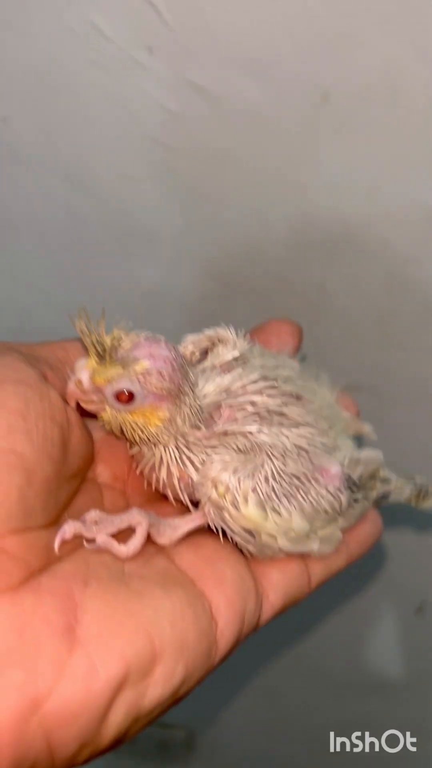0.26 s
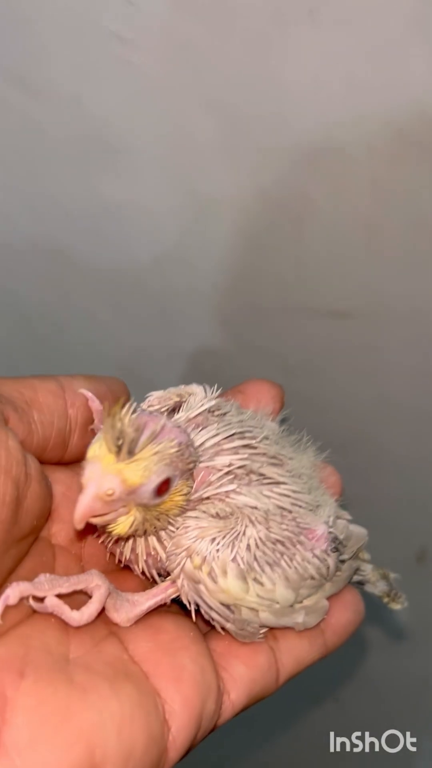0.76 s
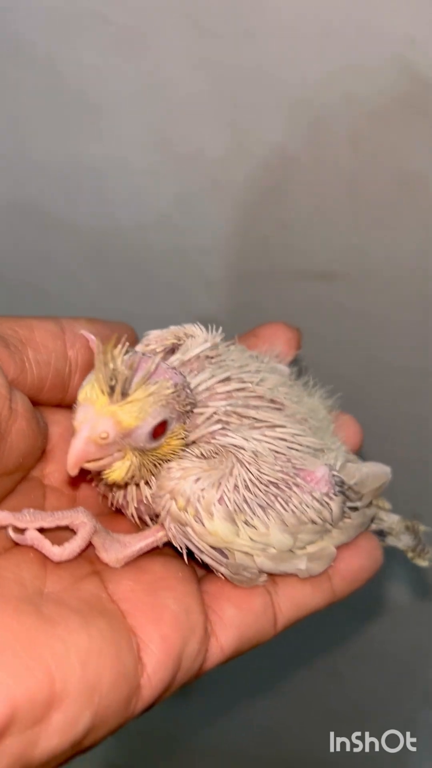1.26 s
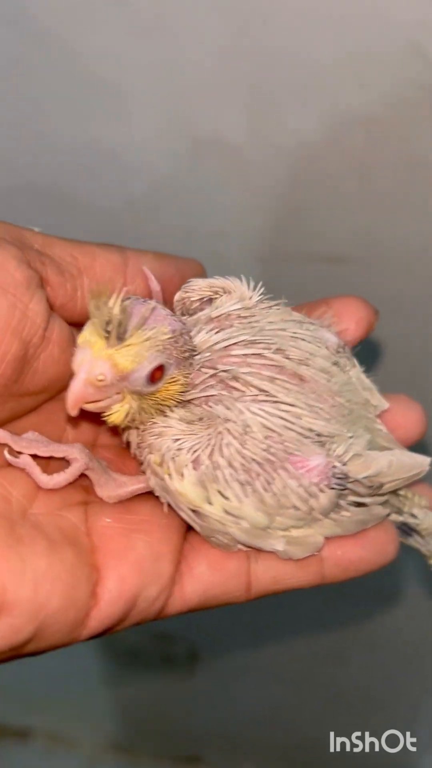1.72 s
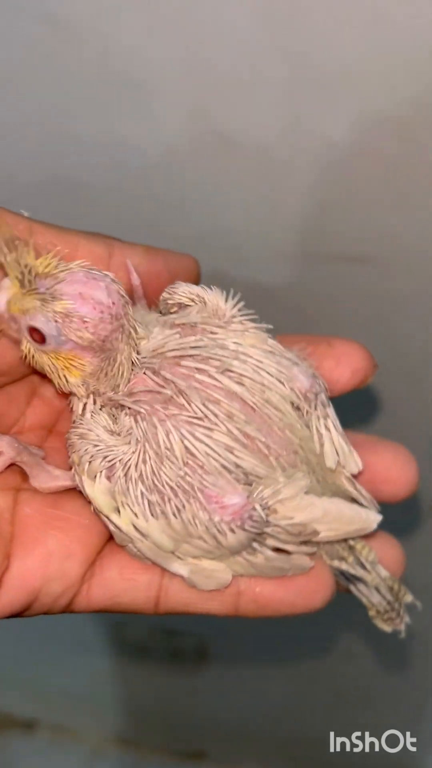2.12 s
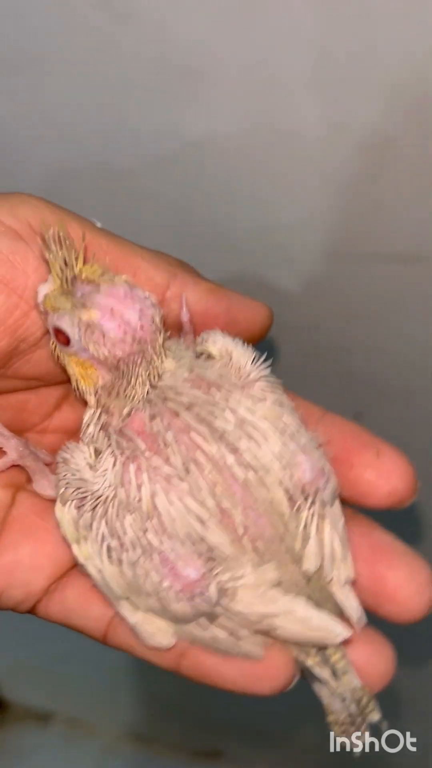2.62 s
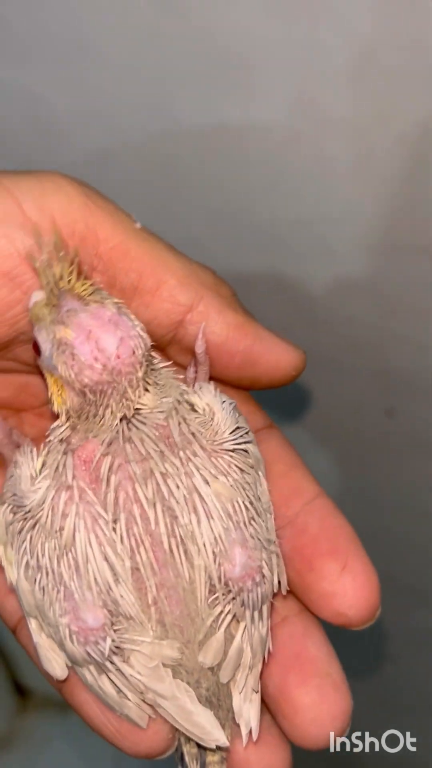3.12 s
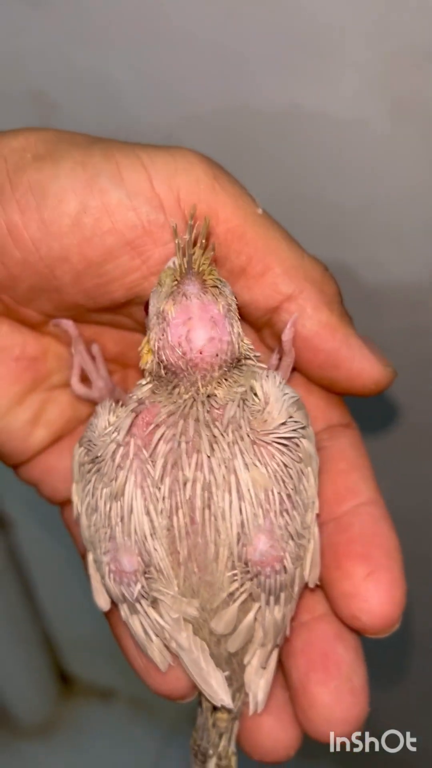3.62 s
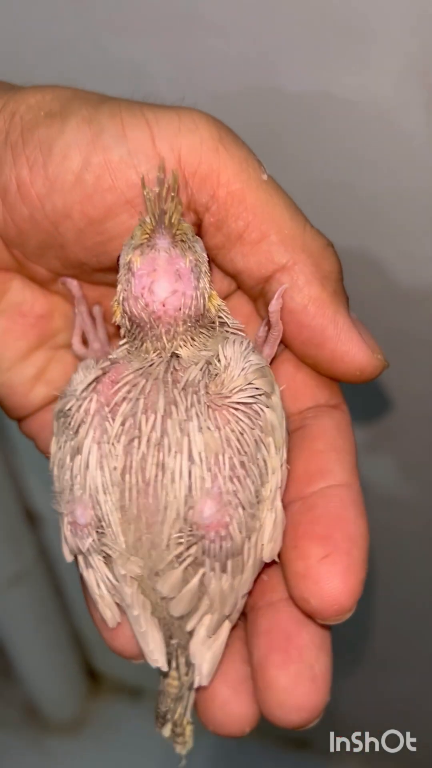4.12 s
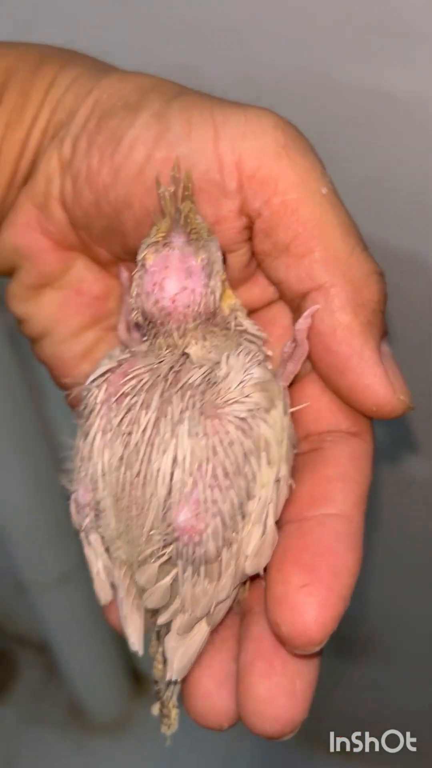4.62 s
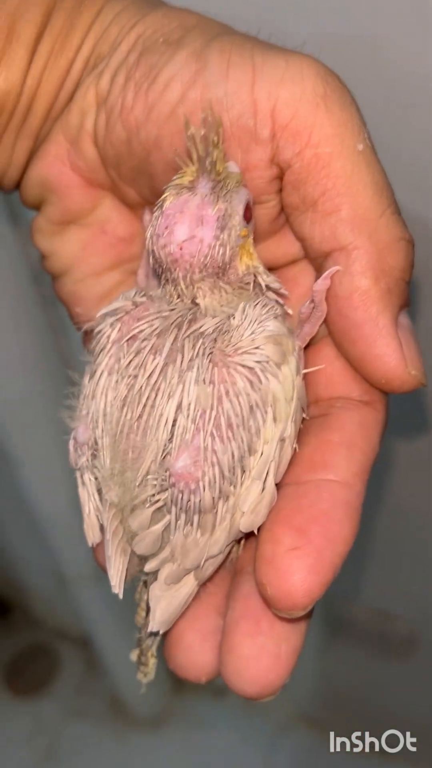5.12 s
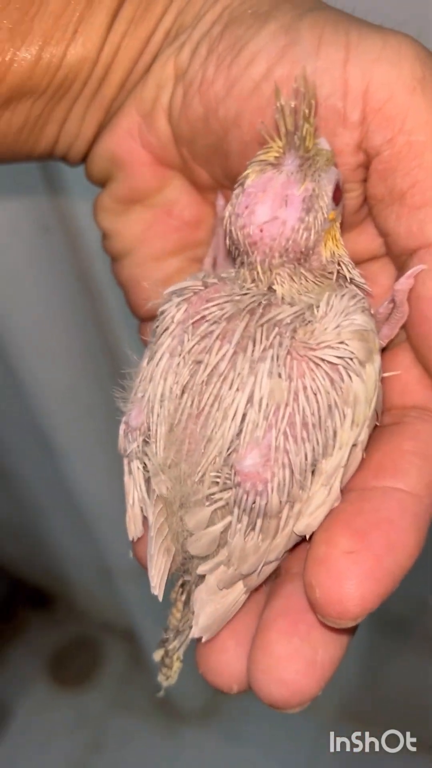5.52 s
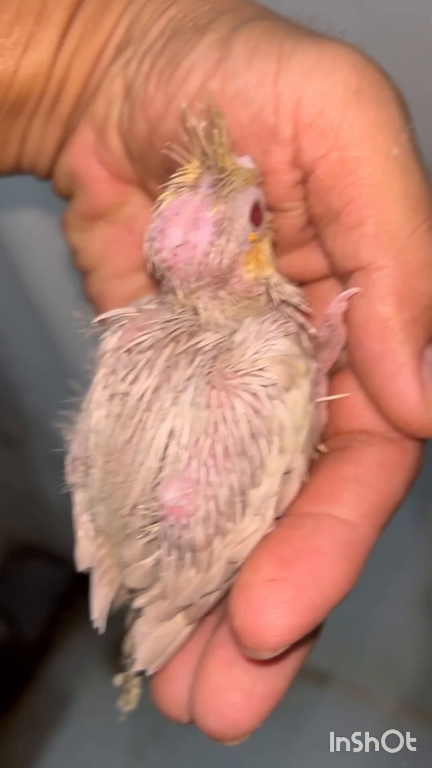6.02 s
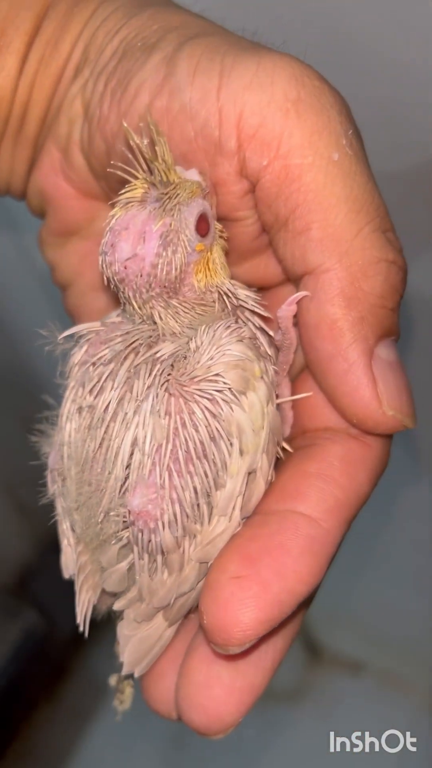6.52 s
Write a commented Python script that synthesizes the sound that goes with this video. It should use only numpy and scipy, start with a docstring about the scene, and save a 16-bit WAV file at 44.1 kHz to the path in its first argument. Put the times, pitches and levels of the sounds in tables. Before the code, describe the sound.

A cockatiel chick begs close to the microphones in a bare, reflective room. From 0 s, rough, scratchy calls follow one another several times a second, each about a tenth to a quarter of a second, scooping upward and sagging, with a shaky whistle, a strong octave and torn rasp between. Breathy hiss spurts at about 0.8, 1.2 and 1.5 s. Two loud squeals come at 2.25 and 2.6 s, the second higher. From 2.9 to 3.8 s the calls are thinner and mixed, over husky chatter. A long clear squeal sounds at 4.05 s, then hoarse cries and a sharp hiss near 4.5 s. After a short lull around 4.85 to 5.05 s, overlapping begging and thin peeps resume, with another strong squeal at 6.13 s, easing into weaker cries by 6.8 s. Faint rumble, distant drones and soft hand shuffles lie underneath.

```python
"""A cockatiel chick, held in a hand in a bare room, begs with scratchy, arching squeals; others seem to overlap it.
Each call is a shaky whistle with an octave, plus a rasp of narrow noise bands between the two.
Bursts of hiss and husky chatter, made of coloured noise and half-voiced peeps, come among the calls.
Early slaps and a decaying tail from the hard walls smear all these voices.
Low rumble, hand shuffles, faint drones and thin hiss lie beneath; two unlike microphones take it all in."""
import sys
import numpy as np
from scipy import signal
from scipy.fft import rfft, irfft, next_fast_len
from scipy.io import wavfile
from scipy.ndimage import uniform_filter1d

SR = 44100
rng = np.random.default_rng(int(sys.argv[2]) if len(sys.argv) > 2 else 0)


def unload_wav(signal):
    """Save mono or channel-first audio to the path in sys.argv[1] as 16-bit WAV at rate SR, clipped to [-1, 1]."""
    wavfile.write(
        sys.argv[1],
        SR,
        np.round(np.clip(np.atleast_2d(signal).T, -1, 1) * 32767).astype(np.int16),
    )


N = 298116  # length of the scene in samples

# The four loud, clear squeals, one curve each. Each row: time in seconds, pitch in Hz before the shake,
# relative levels of fundamental, octave and rasp in dB, roughness 0-1.
SQUEAL_CURVES = [
    [(2.25, 1658, -29, -31, -49, 0.34), (2.285, 1997, -31.5, -16.5, -63, 0.28),
     (2.36, 2054, -28, -19, -56, 0.03), (2.41, 2214, -24.5, -17.5, -39, 0.07),
     (2.47, 2268, -33, -21.5, -25, 0.06), (2.52, 2220, -25, -26, -27, .1),
     (2.57, 2160, -65, -22, -20, 0.41)],
    [(2.61, 1866, -40, -23, -54, 0.28), (2.66, 1976, -27, -14, -21, 0.35),
     (2.7, 2497, -22.5, -24, -25.5, 0.25), (2.78, 2672, -23, -27.5, -35, 0.08),
     (2.86, 2700, -24, -27, -31, 0.27), (2.915, 2610, -23, -31, -31, 0.24),
     (2.97, 2590, -55, -45, -45, 0.34)],
    [(4.05, 1656, -39, -27, -34, 0.04), (4.085, 2024, -45, -15.5, -21.5, 0.15),
     (4.18, 2069, -24, -12, -36.5, 0), (4.27, 2182, -30.5, -19, -57, 0.01),
     (4.34, 2099, -24, -15, -52, 0.09), (4.37, 2028, -39, -17, -17, 0.21), (4.42, 2072, -41, -27, -33, .05),
     (4.47, 2080, -51, -27, -23, 0.08)],
    [(6.13, 1579, -58, -24, -40, .3), (6.18, 1965, -28.5, -13, -19.5, 0.26),
     (6.26, 1964, -31, -10.5, -33.5, 0.19), (6.32, 2087, -26.5, -19, -34, .16),
     (6.4, 2011, -36, -11.5, -67, 0.24), (6.48, 1970, -32, -32, -53, 0.36),
     (6.6, 1878, -40, -37, -32, 0.31)],
]
# Begging calls, mostly rough, a few clear. Each row: start in seconds, length in seconds,
# rise to the top in seconds, top pitch in Hz, scoop (share below the top at the start),
# sag (share below it at the end), relative levels of fundamental, octave and rasp in dB,
# roughness 0-1, swell from start to end in dB.
BEG_CALLS = [ (0.0, 0.027, 0.09, 1403, 0.089, 0, -42, -19.5, -30, 0.76, -49),
             (0.098, 0.12, 0.11, 1766, 0.16, 0.18, -43, -22.5, -29.5, 0.75, 4.5),
             (0.155, 0.087, 0.049, 2444, 0.00067, 0.025, -25.5, -42, -46, 0.53, 0),
             (0.26, 0.066, .01, 1972, 0.015, 0.19, -52, -17.5, -44, 0.47, -8),
             (0.337, .15, .01, 1760, 0.018, 0, -36, -44, -60, 0.63, -4),
             (0.55, 0.17, 0.11, 2416, 0.13, 0.16, -32, -54, -55, 0.7, 2),
             (0.651, 0.14, 0.0086, 1935, 0.049, 0.034, -40, -31, -40.5, 0.38, -13),
             (0.773, 0.21, .12, 1781, 0.21, 0.013, -33, -31.5, -51, 0, -3),
             (0.849, 0.21, .125, 2397, .25, 0.03, -27.5, -21, -24.5, .5, 4),
             (0.973, 0.12, 0.055, 1636, .05, 0.0045, -33, -45, -48, 0.34, 8),
             (1.167, 0.24, .14, 1956, .24, 0.12, -35.5, -18.5, -27, 0.46, 4.5),
             (1.387, 0.14, .09, 2276, .1, 0.051, -26, -33.5, -27, 0.78, 0),
             (1.52, 0.1, .09, 1975, .1, 0, -28, -26, -52, 0.8, -5),
             (1.599, 0.16, 0.12, 2376, 0.043, 0.0084, -22, -28.5, -57, 0.54, 3),
             (1.73, 0.057, 0.0037, 2066, 0, 0.28, -26.5, -25, -31, 0.42, -2),
             (1.813, 0.16, 0.085, 3160, 0.15, 0, -46, -38.5, -39, .6, -11),
             (1.997, 0.14, 0.11, 2518, .25, 0.039, -31.5, -32.5, -28, .7, -5),
             (2.091, 0.12, 0.0078, 2514, 0, .12, -25, -47, -39, 0.63, 0),
             (2.112, 0.092, 0.042, 3083, 0.066, 0.05, -26.5, -41, -48, 0.78, -4),
             (2.437, 0.15, 0.15, 1824, 0.025, 0.018, -38.5, -20.5, -26, 0.48, 0),
             (2.705, .15, 0.094, 2003, 0.033, 0.051, -35, -55, -54, 0.42, 3),
             (2.92, 0.23, 0.0031, 3715, 0.03, 0.18, -44, -42, -60, 0.3, -5),
             (3.107, .12, 0.081, 1986, 0.023, 0, -34, -66, -75, 0.43, -20),
             (3.165, 0.4, .15, 3787, .05, 0.0031, -42.5, -45, -69, 0.1, -9),
             (3.254, 0.058, 0.017, 1923, 0, 0.018, -27.5, -62, -61, .5, -3),
             (3.306, .13, 0.0333, 2675, 0.17, 0.0071, -29, -44, -59, 0.25, -4),
             (3.497, 0.098, 0.047, 2574, 0.079, 0.094, -34.5, -42, -35, 0.5, -2),
             (3.56, 0.1495, .045, 1749, 0.22, .04, -44, -23, -35, 0.55, -2),
             (3.76, 0.045, 0.012, 3215, 0, 0.082, -29, -32, -55, 0.2, -7),
             (3.945, 0.11, 0.039, 2100, 0.1, 0, -35, -27, -49, 0.54, -12),
             (4.343, 0.15, 0.029, 1726, 0, 0.037, -70, -30.5, -42, 0.03, 20),
             (4.537, 0.17, .135, 2051, .26, 0.012, -31, -21, -41, 0.44, 0),
             (4.741, 0.072, 0.008, 1890, 0.014, 0.069, -31.5, -21.5, -30.5, 0.48, -19),
             (5.075, 0.24, 0.077, 2257, .23, 0.26, -29.5, -44.5, -37, 0.49, 0),
             (5.284, 0.15, 0.064, 1674, 0.051, 0.0021, -41, -22.5, -33.5, 0.53, -11.5),
             (5.454, 0.13, 0.049, 1738, .11, 0.054, -49, -21, -54, 0.21, -7),
             (5.473, 0.11, 0.049, 2730, 0.24, 0.019, -40, -29.5, -26.5, 0.7, -6),
             (5.58, .16, 0.12, 1776, 0.056, 0, -66, -29.5, -44, 0.53, 0),
             (5.649, 0.19, 0.0068, 1457, 0, 0.02, -41, -40.5, -62, 0.7, -6),
             (5.875, 0.17, .01, 1552, 0, .06, -44, -41, -56, .8, 13),
             (6.012, 0.17, 0.075, 2218, 0.21, 0.033, -39.5, -31, -28.5, 0.97, -10.5),
             (6.2, 0.17, 0.054, 1732, .03, 0.0095, -47, -24.5, -34.5, 0.32, -2),
             (6.509, 0.088, 0.053, 2080, 0.12, 0, -29.5, -35, -30.5, 0.77, -3), ]
# Thin whistled peeps. Each row: start in seconds, length in seconds, first pitch in Hz, last pitch in Hz,
# relative level in dB, roughness 0-1, swell from start to end in dB.
PEEP_CALLS = [ (0.939, 0.05, 3250, 3200, -17, 0.07, -5), (.995, .155, 3253, 2920, -19, .17, -9.5),
              (1.11, 0.11, 2560, 2380, -23, .45, 0), (1.952, 0.055, 2620, 2666, -31, 0.2, -8),
              (3.763, .13, 3140, 2820, -29.5, .22, 17), (3.91, .16, 2930, 2630, -26.5, 0.31, -9),
              (4.804, 0.059, 3230, 3070, -27.5, 0.1, 9), (5.15, 0.12, 2800, 3045, -33.5, 0.3, -1),
              (5.333, 0.068, 2830, 2890, -24.5, 0.37, -7), (5.41, 0.1, 2880, 3020, -27.5, 0.2, 10),
              (5.886, 0.18, 3020, 2748, -29.5, 0.69, 10), (6.1, 0.13, 3200, 3190, -24, 0.09, -1),
              (6.579, 0.087, 2702, 2760, -26.5, .28, -1), (6.723, 0.057, 2870, 2620, -30, 0.05, -13), ]
# Upper harmonics of a call. Each row: multiple of the fundamental, level in dB against (mostly) the octave,
# change in dB at full roughness.
OVERTONE_LEVELS = [(3, -16.5, -32.5), (4, -22, -8), (5, -19.5, -30), (6, -38, -26), (7, -44.5, -32)]
RISE_BEND, SAG_BEND = 1.4, 1.3  # powers that round the two sides of the pitch arch
ATTACK_S, RELEASE_S, ENDS_DB = 0.029, 0.033, -4  # a call swells from ENDS_DB, holds and dies back to it
PEEP_OCTAVE_DB, PEEP_RASP_DB = -34.5, -17  # against a peep's fundamental

# Hiss through the open beak. Each row: start in seconds, length before the quick fade in seconds,
# relative level in dB.
HISS_BURSTS = [(-.02, 0.12, -30), (.52, 0.36, -46), (.8, 0.15, -27), (1.18, 0.043, -18.5),
               (1.32, 0.092, -28), (1.53, 0.096, -29.5), (1.68, 0.21, -34.5), (2.05, 0.24, -36.5),
               (2.28, 0.23, -33.5), (2.56, 0.11, -29.5), (2.93, 0.065, -34), (3.2, 0.63, -41),
               (3.56, 0.092, -32.5), (3.88, 0.21, -32.5), (4.475, 0.072, -20.5), (5.08, .3, -47.5),
               (5.46, 0.047, -28.5), (5.66, 0.14, -42), (5.87, 0.084, -40), (6.14, 0.13, -36),
               (6.5, 0.041, -39.5)]
# Colour of the hiss. Each row: frequency in Hz, relative density in dB per Hz.
HISS_SPECTRUM = [(500, -34), (1100, -17.5), (1700, -9), (3500, 10), (5300, 4.5), (6500, -1), (8000, -0.5),
                 (11500, -17), (14500, -14)]
# Husky chatter under the calls. Each row: start in seconds, length before the quick fade in seconds,
# relative level in dB.
CHATTER_BOUTS = [(-.02, 0.059, -25), (.22, 0.046, -32), (.48, 0.055, -36), (.87, 0.27, -32.5),
                 (1.26, 0.1, -31), (1.51, .08, -35.5), (1.78, 0.19, -34), (2.17, 0.16, -34.5),
                 (2.56, 0.86, -30), (3.1, 0.74, -38), (3.77, 0.18, -35), (3.93, 0.22, -30),
                 (4.51, 0.055, -37.5), (4.77, 0.068, -33), (5.42, 0.043, -29.5), (6.05, 0.18, -28),
                 (6.3, 0.48, -34.5), (6.68, .1, -36)]
# Colour of the chatter. Each row: frequency in Hz, relative density in dB per Hz.
CHATTER_SPECTRUM = [(400, -37), (1050, -17.5), (1300, -2), (1550, -0.5), (2200, 1), (3400, -10),
                    (4300, -15.5), (5500, -32), (9000, -27), (15000, -41)]
# Dips in the soft husk between bursts. Each row: start in seconds, end in seconds.
HUSK_DIPS = [(.33, .56), (2.32, 2.52), (2.7, 2.93), (4.08, 4.48), (4.84, 5.12)]
HUSK_DIP_DB = -5.5
HISS_REST_DB, CHATTER_REST_DB = -49, -44  # both go on softly between bursts
BURST_ATTACK_S = .04
BURST_SAG_DB_PER_S, BURST_RELEASE_DB_PER_S = 16.5, 151  # the release adds to the sag

# Decay of the bare room. Each row: frequency in Hz, time to fall 60 dB in seconds.
ROOM_DECAY = [(500, 0.53), (2000, 0.68), (4000, 0.66), (8000, 0.56), (14000, 0.54)]

# Dull shuffles of the hand. Each row: start in seconds, length in seconds, relative level in dB.
HAND_SHUFFLES = [(0.228, 0.28, -52.5), (1.388, 0.37, -50.5), (1.687, 0.31, -54.5), (3.126, 0.26, -48),
                 (3.844, 0.33, -45.5), (4.036, 0.6, -50.5), (5.414, 0.46, -50.5), (6.534, 0.48, -53)]
# Colour of the shuffles. Each row: frequency in Hz, relative density in dB per Hz.
SHUFFLE_SPECTRUM = [(25, -3), (50, 0.5), (90, 1.5), (150, -3.5), (200, -3.5), (300, -8.5), (420, -6.5),
                    (650, -14), (1000, -12), (1800, -67)]
# Faint far-off drones. Each row: start in seconds, end in seconds, pitch in Hz, width in Hz,
# relative level in dB.
FAR_DRONES = [(-.1, 1.082, 127.6, 5.7, -60.5), (1.432, 1.716, 391, 87, -53.5), (1.6, 2.03, 470, 84, -52.5),
              (2.152, 4.18, 57.35, 1.5, -55), (3.155, 3.343, 520, 65, -56.5), (3.798, 4.248, 745, 82, -55),
              (3.955, 4.567, 302.4, 9.6, -51.5), (3.999, 4.597, 370, 40, -58),
              (4.448, 5.447, 298, 19, -61.5), (5.047, 5.406, 697, 350, -56), (5.403, 5.7, 415, 51, -49.5),
              (5.88, 6.424, 660, 73, -61), (6.548, 6.847, 399.7, 91, -56.5)]
# Colour of the room rumble. Each row: frequency in Hz, relative density in dB per Hz.
RUMBLE_SPECTRUM = [(12, -36), (20, -3.5), (42, -3), (59, 5.5), (91, -6), (123, -3.5), (166, -8.5),
                   (236, -11.5), (290, -7), (330, -8.5), (419, -11), (524, -15), (900, -11.5), (1170, -7),
                   (1980, -120)]
# Stereo spread of rumble and shuffles. Each row: frequency in Hz, side against mid in dB.
LOW_NOISE_SPREAD = [(30, -16), (60, -20), (125, -15.5), (250, -15.5), (500, -3), (900, -2.5)]
RUMBLE_REST_DB = -53.5

# Level lead of the left microphone. Each row: frequency in Hz, left minus right in dB.
LEFT_LEVEL_LEAD = [(60, 0.5), (110, 2.5), (200, 2.5), (380, -2.5), (700, 2.5), (1290, -0.5), (2380, 3.5),
                   (4400, 3.5), (8120, 0.5), (15000, -0.5)]
# Phase lead of the left microphone; near 10 kHz the two are in opposite phase.
# Each row: frequency in Hz, lead in radians.
LEFT_PHASE_LEAD = [(400, 0), (1450, -1), (1800, .3), (3200, .85), (5000, .3), (5700, -1.2), (6400, 0),
                   (7500, -.2), (8300, -1.3), (9050, -3.03), (10000, -3.14), (10900, -3.35), (11400, -4.4),
                   (11850, -6.2), (13800, -6.3), (14650, -9.1), (15500, -9.4)]
# Difference between the microphones. Each row: frequency in Hz, gain of the side signal in dB.
SIDE_GAIN = [(4500, 3.5), (5700, 7), (7200, -2.5), (8500, 1.5), (9200, -13), (10000, -24.5), (10800, 4),
             (11400, -1.5), (12200, -15.5), (13600, -21), (14400, -1.5)]
# Bass roll-off of the microphones. Each row: frequency in Hz, gain in dB.
MIC_BASS = [(15, -31.5), (25, -5), (32, -6), (42, -0.5)]
# Treble colour of the microphones. Each row: frequency in Hz, gain in dB.
MIC_TREBLE = [(7000, -2), (8000, -7), (9000, 3.5), (10000, -2.5), (10900, 2.5), (11500, 3), (13000, 1.5),
              (14500, 0), (15600, -6.5)]
BAND_LIMIT_HZ = 15700


def call(rows, jitter=0.02863, jitter_hz=150, fray_onset=0.26, warble=0.0291, quiver=0.0036,
         flutter_db=4.0, flutter_hz=80, buzz_hz=390, buzz_depth=0.66,
         strand_hz=50, strand_drift=.06, rasp_low=1.36, rasp_high=1.85, count=4):
    """The syrinx whistles on a shaking pitch, and torn strands of noise fill the gap under the octave."""
    s, *columns = np.transpose(rows)
    t = np.arange(s[0], s[-1], 1 / SR)[:SR]
    hz, first_db, octave_db, rasp_db, rough = (np.interp(t, s, c) for c in columns)

    # the fast shake sets in early and soon reaches its full depth
    fray = np.tanh(rough / fray_onset)
    shake = fray * jitter * wander(t, jitter_hz)  # share of the pitch
    shake = shake + rough * warble * wander(t, 26.9) + quiver * wander(t, 31)
    turns = np.cumsum(hz * (1 + shake)) / SR

    first, octave = gain_of(first_db), gain_of(octave_db)
    # clear calls ring with overtones; rough ones lose 4 the least, and the others by about 26 dB or more
    overtones = sum(gain_of(db + rough_db * rough) * np.sin(2 * np.pi * round(k) * turns)
                    for k, db, rough_db in OVERTONE_LEVELS)
    whistle = first * np.sin(2 * np.pi * turns) + octave * np.sin(4 * np.pi * turns)
    whistle = whistle + np.hypot(0.21 * first, octave) * overtones

    # a second, slower vibration chops the whistle and gives it sidebands
    buzz_turns = np.cumsum(buzz_hz * (1 + 0.203 * wander(t, 20.26))) / SR
    buzz = np.sin(2 * np.pi * buzz_turns)
    whistle = np.sqrt(2) * whistle * evened(1 + buzz_depth * rough * buzz)

    strands = np.zeros(len(t))
    for place in np.linspace(rasp_low, rasp_high, count):  # multiples of the pitch
        strength = gain_of(10 * np.tanh(wander(t, 14.5)))
        strand_turns = np.cumsum(hz * (place + strand_drift * wander(t, 14.52))) / SR
        strands += strength * fuzz(t, strand_turns, strand_hz)
    rasp = gain_of(rasp_db) * evened(strands)

    # the membranes catch and let go, so the whole call comes in scratchy spurts
    flutter = np.clip(wander(t, flutter_hz), -2, 2)
    spurts = evened(gain_of(flutter_db * (1 - .5 * rough) * flutter))
    edges = np.clip(np.minimum((t - t[0]) / .022, (t[-1] - t) / .012), 0, 1)
    return s[0], (whistle + rasp) * spurts * edges


def beg(start, length, rise_s, top_hz, scoop, sag, first_db, octave_db, rasp_db, rough, swell_db):
    """A begging call, rough or clear: the pitch scoops up towards its top and sags; one effort drives it all."""
    t = np.arange(0, length, .002)
    rising = np.maximum(1 - t / rise_s, 0)
    falling = np.maximum(t - rise_s, 0) / max(length - rise_s, 1e-3)
    hz = top_hz * (1 - scoop * rising ** RISE_BEND - sag * falling ** SAG_BEND)
    db = effort(t, length, swell_db)
    roughness = np.full(len(t), rough)
    return call(np.column_stack([start + t, hz, first_db + db, octave_db + db, rasp_db + db, roughness]))


def peep(start, length, first_hz, last_hz, level_db, rough, swell_db):
    """A thin, straight glide with most of its strength in the fundamental."""
    t = np.arange(0, length, .002)
    hz = np.linspace(first_hz, last_hz, len(t))
    db = level_db + effort(t, length, swell_db)
    roughness = np.full(len(t), rough)
    return call(np.column_stack([start + t, hz, db, db + PEEP_OCTAVE_DB, db + PEEP_RASP_DB, roughness]))


def effort(t, length, swell_db):
    """The level of one call in dB: attack, a hold that swells or fades, release."""
    closed = np.maximum(1 - t / ATTACK_S, 0) + np.maximum(1 - (length - t) / RELEASE_S, 0)
    return ENDS_DB * closed + swell_db * (t / length - .5)


def husk(envelope, colour, scratch_db, peeps_db, lumps_db):
    """Air forced through a small throat: coloured noise and half-voiced peeps, in quick spurts and slow lumps."""
    quick = evened(uniform_filter1d(rng.standard_normal(N), size=160))
    slow = evened(uniform_filter1d(rng.standard_normal(N), size=1400))
    source = rng.standard_normal(N) + gain_of(peeps_db) * chirps()
    uneven = source * gain_of(scratch_db * quick + lumps_db * slow)
    return envelope * evened(coloured(uneven, colour))


def chirps(count=420, spread_hz=55, glide=1.2):
    """A tangle of short, husky gliding peeps at random pitches, rms 1."""
    out = np.zeros(N)
    for start, length, pitch, slope, size in rng.random((count, 5)):
        t = np.arange(0, 0.018 + 0.13 * length, 1 / SR)
        hz = 1400 * 5.5 ** pitch * (1 + glide * (2 * slope - .8) * t)
        # higher peeps are more thinly spaced, so each is a little stronger
        strength = np.sqrt(hz) * gain_of(2.9 * size)
        chirp = strength * fuzz(t, np.cumsum(hz) / SR, spread_hz)
        add(out, start * N / SR, chirp * signal.windows.tukey(len(t), .5))
    return evened(out)


def level(bursts, rest_db):
    """Gain over time: bursts swell, sag and die away over a soft resting level that dips at times."""
    dip = np.zeros(N)
    for start, end in HUSK_DIPS:
        add(dip, start, signal.windows.tukey(round((end - start) * SR), .5))
    power = gain_of(rest_db + HUSK_DIP_DB * dip) ** 2
    for start, length, db in bursts:
        t = np.arange(0, length + .4, 1 / SR)
        fall_db = BURST_SAG_DB_PER_S * t + BURST_RELEASE_DB_PER_S * np.maximum(t - length, 0)
        add(power, start, np.minimum(t / BURST_ATTACK_S, 1) * gain_of(db - fall_db) ** 2)
    return np.sqrt(power)


def room(x, direct_db=-3.0, early_db=-7, wet_db=-5.0, likeness=0.81, count=7):
    """Direct sound, a few slaps from the near walls, and a tail partly shared by the two microphones."""
    taps = rng.standard_normal((2, SR)) * (rng.random((2, SR)) < .12)
    taps[:, :round(.006 * SR)] = 0  # the tail waits 6 ms
    taps[1] = likeness * taps[0] + np.sqrt(1 - likeness ** 2) * taps[1]

    # each frequency decays at its own rate
    hz, t, z = signal.stft(taps, SR, nperseg=256)
    t60 = read(ROOM_DECAY, hz)[:, None]
    tail = signal.istft(z * gain_of(-60 * t / t60), SR, nperseg=256)[1]
    tail *= gain_of(wet_db) / np.linalg.norm(tail, axis=1, keepdims=True)

    slap_gain = gain_of(early_db) / np.sqrt(count)
    for ear in tail:
        for delay_s, sign in zip(rng.uniform(.002, .016, count), rng.choice([-1, 1], count)):
            add(ear, delay_s, np.array([sign * slap_gain]))
    return gain_of(direct_db) * x + signal.fftconvolve(x[None], tail, axes=1)[:, :N]


def background(air_db=-70):
    """Steady low rumble, soft shuffles of the hand, faint drones and thin hiss, all of shaped noise."""
    shuffling, drones = np.zeros((2, N))
    for start, length, db in HAND_SHUFFLES:
        arch = np.sin(np.pi * np.arange(0, length, 1 / SR) / length)
        add(shuffling, start, gain_of(db) * arch)
    for start, end, hz, width_hz, db in FAR_DRONES:
        t = np.arange(start, end, 1 / SR)
        drone = gain_of(db) * fuzz(t, hz * t, width_hz / 2)
        add(drones, start, drone * signal.windows.tukey(len(t), .4))
    rumble = gain_of(RUMBLE_REST_DB) * low_noise(RUMBLE_SPECTRUM)
    shuffles = shuffling * low_noise(SHUFFLE_SPECTRUM)
    return rumble + shuffles + drones + gain_of(air_db) * rng.standard_normal((2, N))


def low_noise(colour):
    """Stereo noise of a given colour, much alike in both ears in the bass."""
    mid, side = evened(coloured(rng.standard_normal((2, N)), colour))
    side = coloured(side, LOW_NOISE_SPREAD)
    return np.array([mid + side, mid - side])


def wander(t, rate_hz):
    """Smooth chance of rms 1 over the times t, about as fast as rate_hz; it repeats every second."""
    points = 4096  # in one second
    hz = np.arange(points // 2 + 1)
    smoothing = np.exp(-(hz / rate_hz / 2) ** 2)
    second = evened(irfft(rfft(rng.standard_normal(points)) * smoothing))
    return np.interp((t - t[0]) % 1 * points, np.arange(points), second)


def fuzz(t, turns, spread_hz):
    """A band of noise, about rms 1, that follows a moving centre given in turns."""
    cosine_part = wander(t, spread_hz) * np.cos(2 * np.pi * turns)
    return cosine_part + wander(t, spread_hz) * np.sin(2 * np.pi * turns)


def coloured(x, points):
    """Filters by a table of Hz and dB."""
    size = next_fast_len(N + 4096)
    gain = gain_of(read(points, np.fft.rfftfreq(size, 1 / SR)))
    return irfft(rfft(x, size) * gain, size)[..., :N]


def read(points, hz):
    """A spectrum table, joined on a log-frequency axis."""
    f, value = np.transpose(points)
    return np.interp(np.log(hz + 1), np.log(f + 1), value)


def gain_of(db):
    """Decibels to amplitude."""
    return 10 ** (np.asarray(db) / 20)


def evened(x):
    """Scales to rms 1."""
    return x / np.sqrt(np.mean(abs(x) ** 2) + 1e-20)


def add(mix, s, sound):
    """Mixes a sound in at s seconds."""
    part = mix[max(round(s * SR), 0):][:len(sound)]
    part += sound[:len(part)]


def scene(calls_db=-1.49, hiss_db=0, chatter_db=-1):
    """Calls, hiss and chatter sound in the room, over the background."""
    voices = [call(rows) for rows in SQUEAL_CURVES]
    voices += [beg(*row) for row in BEG_CALLS]
    voices += [peep(*row) for row in PEEP_CALLS]
    calls = np.zeros(N)
    for start, sound in voices:
        add(calls, start, sound)
    hiss = husk(level(HISS_BURSTS, HISS_REST_DB), HISS_SPECTRUM,
                scratch_db=-1.0, peeps_db=-5, lumps_db=4.0)
    chatter = husk(level(CHATTER_BOUTS, CHATTER_REST_DB), CHATTER_SPECTRUM,
                   scratch_db=2.5, peeps_db=1.5, lumps_db=1.84)
    birds = gain_of(calls_db) * calls + gain_of(hiss_db) * hiss + gain_of(chatter_db) * chatter
    return room(birds) + background()


def record(dry):
    """Two microphones that differ in level and phase, with their bass roll-off, treble and band limit."""
    hz = np.fft.rfftfreq(N, 1 / SR)
    mid, side = dry.mean(0), coloured((dry[0] - dry[1]) / 2, SIDE_GAIN)
    # half of each lead goes to the left, the opposite half to the right
    lead = gain_of(read(LEFT_LEVEL_LEAD, hz) / 2) * np.exp(.5j * read(LEFT_PHASE_LEAD, hz))
    ears = irfft(rfft(np.array([mid + side, mid - side])) * np.array([lead, 1 / lead]), N)
    ears = coloured(ears, MIC_BASS + MIC_TREBLE)
    lowpass = signal.firwin(511, BAND_LIMIT_HZ, window=("kaiser", 9), fs=SR)
    return signal.oaconvolve(ears, lowpass[None], "same", axes=1)


dry = scene()
out = record(dry)
unload_wav(out)
```